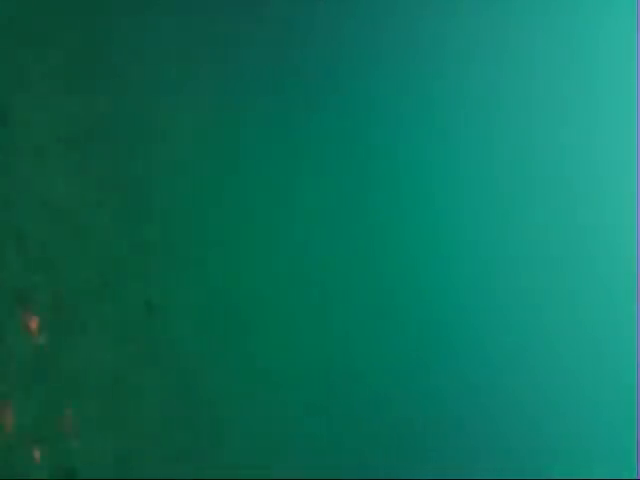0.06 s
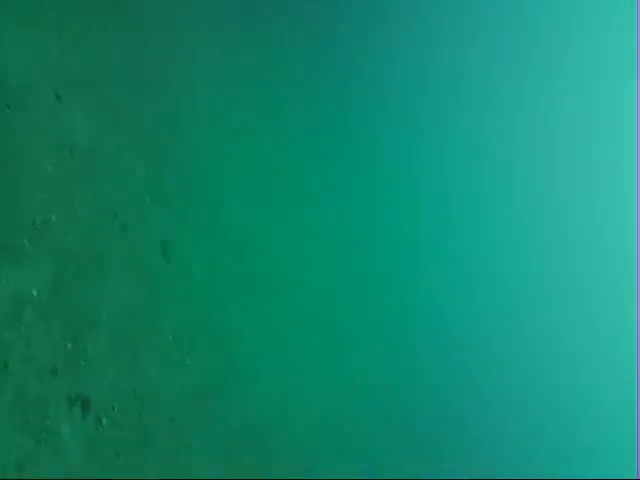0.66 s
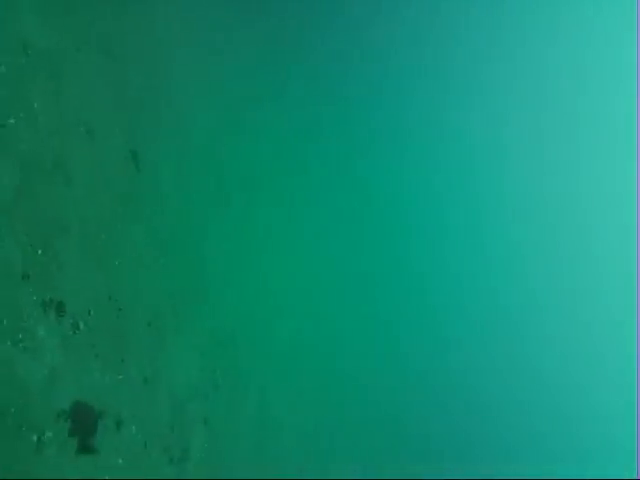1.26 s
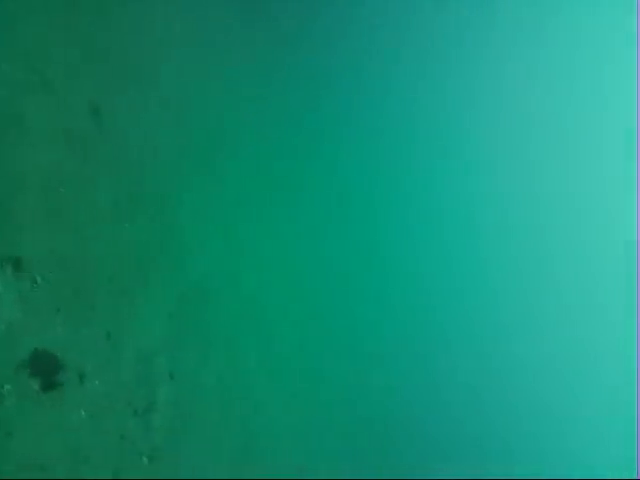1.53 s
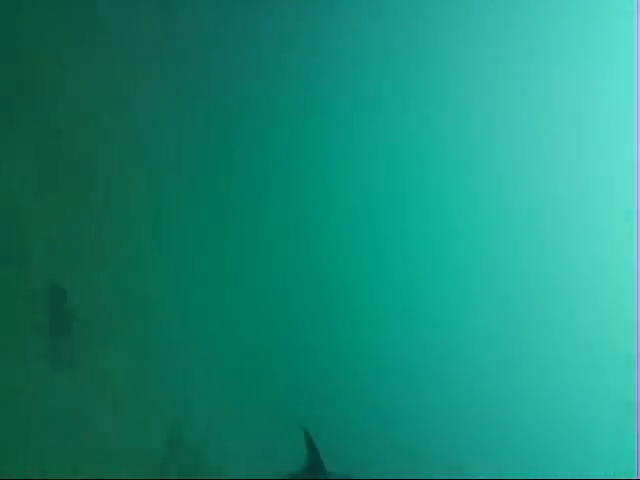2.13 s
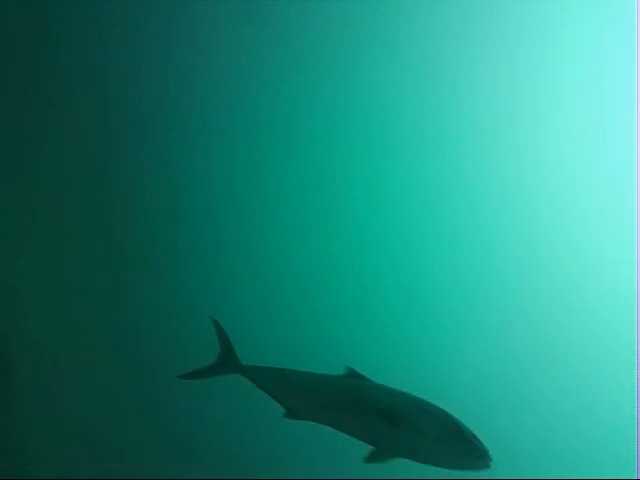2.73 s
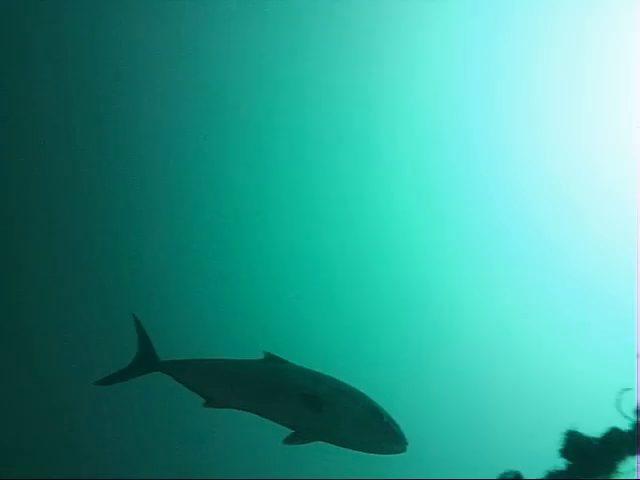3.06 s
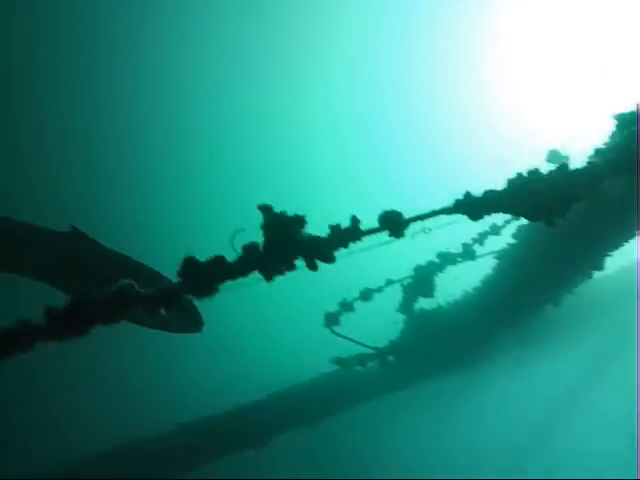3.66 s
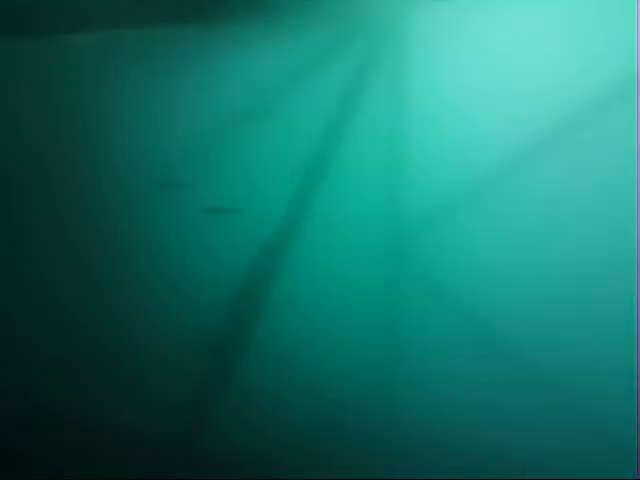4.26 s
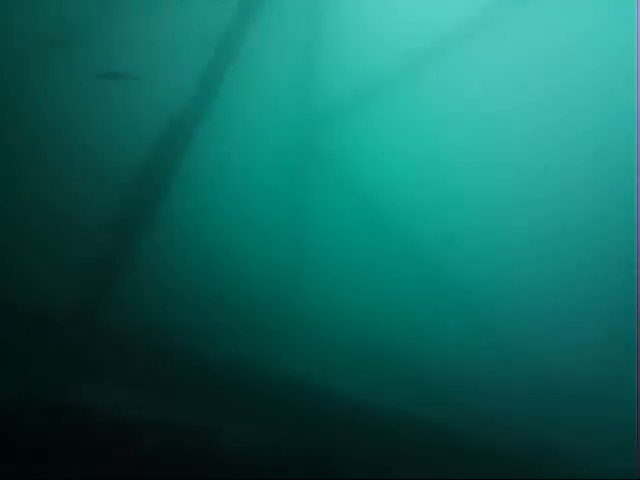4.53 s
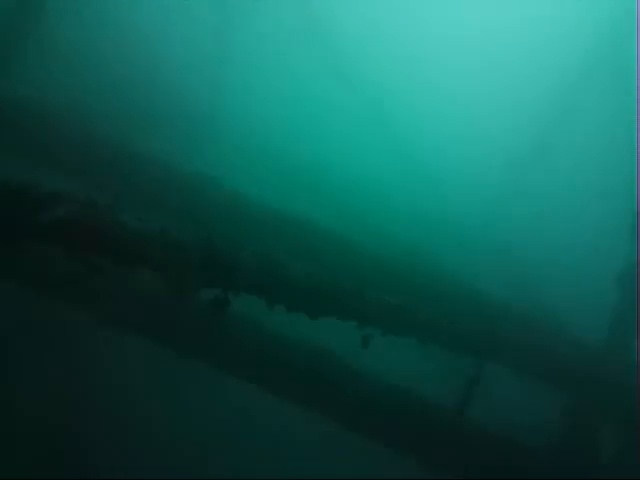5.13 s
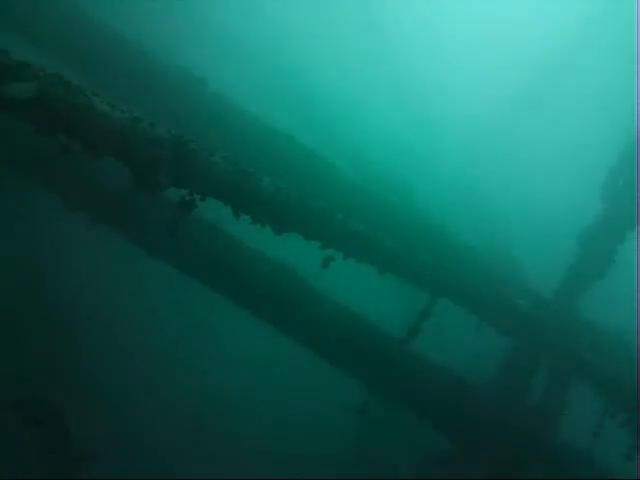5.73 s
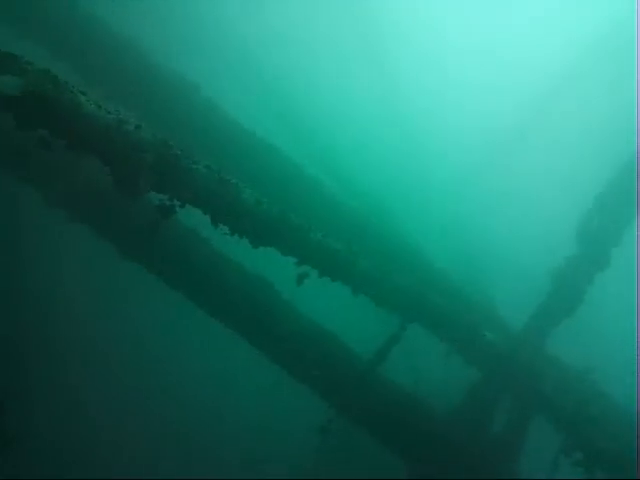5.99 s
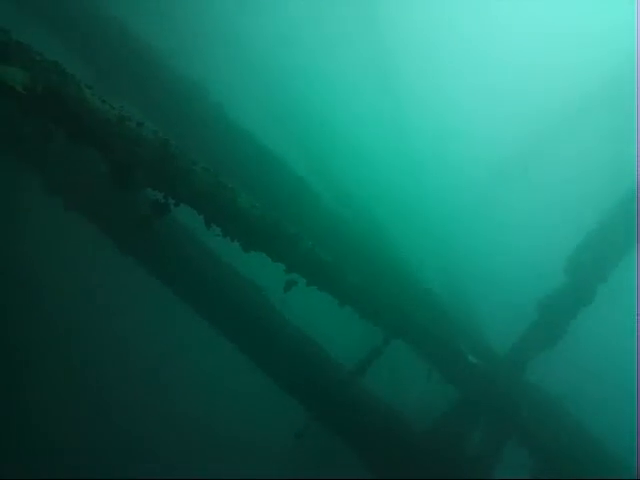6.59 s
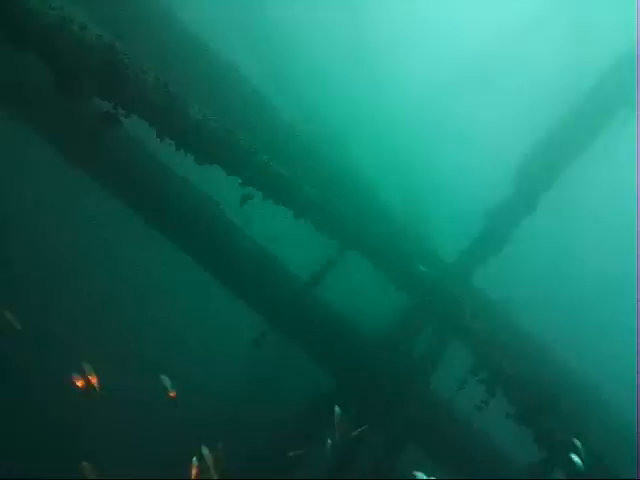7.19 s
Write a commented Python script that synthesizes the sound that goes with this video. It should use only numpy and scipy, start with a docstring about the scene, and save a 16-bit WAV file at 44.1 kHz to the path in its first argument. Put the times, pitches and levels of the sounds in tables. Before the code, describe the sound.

Muffled underwater rumble and faint hiss with scattered knocks, rubs and small bubbles, broken midway by one loud, distorted crack on the camera housing.

```python
"""Under water by a sunken frame, heard from inside the sealed housing of a diver's camera.
Water rumbles as the diver moves, over the steady hiss and whine of the electronics.
Fingers and gear rub, knock and tick on the housing, which rings briefly, and small bubbles pop.
Midway one hard blow cracks against the shell and overloads the input; the shell flexes and lets go."""
import sys
import numpy as np
from scipy import signal
from scipy.fft import rfft, irfft
from scipy.io import wavfile
from scipy.ndimage import uniform_filter1d

SR = 44100
rng = np.random.default_rng(int(sys.argv[2]) if len(sys.argv) > 2 else 0)


def bounce(signal):
    """Save signal as a 16-bit WAV file at the path given by the first command-line argument."""
    frames = np.transpose(np.atleast_2d(signal))
    limited = np.clip(frames, -1, 1)
    pcm = np.round(limited * 32767).astype(np.int16)
    wavfile.write(sys.argv[1], SR, pcm)


N = 320607
TIME = np.arange(N) / SR
SOFT_TAPER = 0.55  # share of a slide that the soft palm spends swelling and fading

# water pushing on the housing, strongest as the camera swings into the blow: [t/s, level/dB]
FLOW_CURVE = [(0, -34.5), (.45, -37), (1.2, -36), (1.75, -42.5), (2.3, -44), (3.1, -41), (3.76, -31.5),
              (3.89, -25), (4.02, -40), (4.55, -46.5), (5, -50), (5.9, -49), (7.27, -54)]
# colours of the slow swirls, the small eddies and the electronic hiss: [f/Hz, level/dB]
RUMBLE_EQ = [(1, 15), (5, 7.5), (10, 10), (16, -6), (24, -4.5), (34, -3), (50, -33.5), (80, -24),
             (200, -93)]
FLUTTER_EQ = [(20, -48), (45, 2), (60, 3), (95, -2), (140, -6), (200, -16), (400, -81)]
HISS_EQ = [(30, 14.5), (90, 5.5), (135, -10), (195, -2), (275, 0.5), (700, 0.5), (2000, 0.8), (4200, -1),
           (5500, -5.5), (7200, -5.5), (9000, -11), (10200, -19.5), (12400, -30), (13000, -80)]
# thin steady tones of the electronics: [f/Hz, level/dB]
WHINE_TONES = [(4048, -70), (6977, -75)]
# the grip creeping on the housing, almost still after the hard blow: [t/s, level/dB]
GRIP_CURVE = [(0, -54.5), (.85, -53), (1.6, -62), (2.6, -53.5), (3.75, -57), (4.1, -82), (4.75, -82),
              (4.95, -67), (5.4, -63), (6, -61.5), (6.3, -61.5), (7.27, -58.5)]
# firmer slides of the hand: [start/s, end/s, dull scuff/dB, gritty scrape/dB, low push/dB, wall f/Hz]
SLIDE_CUES = [(0.069, 0.13, -59, -42.5, -36, 493), (0.35, 0.416, -74, -48, -39, 640),
              (0.467, 0.63, -68, -62, -49, 275), (0.901, 1.054, -47, -51.5, -45, 288),
              (1.311, 1.428, -53, -65, -53, 430), (2.542, 2.71, -65, -72, -62, 275),
              (3.04, 3.156, -52, -63, -45, 430), (3.132, 3.25, -67, -80, -48, 557),
              (3.816, 3.89, -33.5, -37.5, -47, 286), (3.863, 3.943, -44, -39, -47, 297),
              (4.172, 4.22, -51.5, -58, -55, 358), (5.118, 5.275, -56, -56, -50, 376),
              (5.424, 5.56, -66, -72, -54, 283), (6.182, 6.282, -58.5, -74, -71, 384),
              (6.274, 6.457, -69.5, -81, -62, 305), (6.684, 6.816, -62, -75, -57, 350),
              (7.228, 7.328, -57.5, -83, -65, 556)]
# colour of the dull scuffing: [f/Hz, level/dB]
RUB_EQ = [(40, -26), (110, 1), (160, 5.5), (210, 5), (300, 5), (360, -43), (425, -4), (560, 6), (760, -5),
          (1020, -3), (1300, -2), (1650, -12), (2600, -14), (8000, -21), (13000, -18)]
# resonances of the housing: [f/Hz, level/dB, t60/s]
HOUSING_MODES = [(298.5, -10.5, 0.18), (370, -18, 0.12), (416, -2, 0.036), (725.4, -2.5, 0.093),
                 (824, 5, 0.025), (1250, -4.5, 0.037), (1400, -3.5, 0.059), (1996, 16, 0.042),
                 (2067, 8.5, 0.063), (2120, -20, 0.026), (2330, -3, 0.039), (2780, -19, 0.094),
                 (3334, 2.5, 0.014), (3750, 0, 0.064), (4287, -8.5, 0.044), (4830, -10.5, 0.052),
                 (5380, -3.5, 0.021), (5640, -7, 0.023), (6130, -9.5, 0.046), (6820, -11, 0.031),
                 (7250, -5.5, 0.053), (7670, -12, 0.04), (8960, 0, 0.072), (9147, -6, 0.03),
                 (12000, -14, 0.047)]
# knocks on the housing: [t/s, ring/dB, snap over ring/dB, thud over ring/dB, wall f/Hz]
KNOCK_CUES = [(0.073, -33.5, 6, -3, 306), (0.121, -42, 4, -1, 850), (0.167, -40, -5.5, -6.5, 726),
              (0.302, -39.5, -2.5, -21, 277), (0.3373, -41, -3, -23, 440), (0.3527, -34.5, -4.5, -21, 640),
              (0.401, -59.5, 1, 15, 611), (0.5455, -24.5, -0.5, -11.5, 274), (0.5709, -53, 10, 3, 406),
              (0.894, -43, -9, -5, 427), (0.928, -47, -17, 11.5, 480), (0.957, -36, -16, 5, 292),
              (0.973, -35, -6, 0.5, 313), (0.999, -43, -17, 15, 513), (1.0112, -32, -13, -9, 300),
              (1.024, -40, -15, -9, 301), (1.1553, -47.5, -4, -12, 278), (1.3095, -53.5, -6, 14.5, 607),
              (1.3202, -29, 0.5, -12, 412), (1.34, -33.5, -11.5, 2, 427), (1.6512, -46, -5, -1, 505),
              (3.0474, -46, -12, -2, 415), (3.674, -38, -3.5, 3, 776), (3.7357, -43, -4, 5, 293),
              (3.7768, -45.5, -5, 8, 785), (3.8217, -24, -24, 2.5, 695), (3.8314, -28, -3, -15, 420),
              (3.8624, -23.5, 9.5, 2, 322), (3.879, -17, -1.5, -11, 286), (3.949, -29.5, -12, -9, 743),
              (5.133, -49, -11, -5, 400), (5.1454, -39.5, -8, -2, 620), (5.1601, -39, -6, 1, 420),
              (5.242, -48, 1, 1, 380), (5.4606, -48, -4, 1, 288), (5.5223, -47.5, -11, -1, 280),
              (5.5842, -41.5, -11, -9, 376), (5.5964, -48, -2.5, 2.5, 306), (5.7922, -50.5, -9, 4, 320),
              (5.824, -50.5, -7, -3, 788), (6.1069, -28, 1, -2.5, 760), (6.1132, -32.5, -2.5, 0.5, 340),
              (6.5828, -43.5, -15, -5, 360), (6.763, -40.5, -18, -17, 355)]
# colour of the dense, short clack under the modes: [f/Hz, level/dB]
CLACK_EQ = [(60, 1), (190, -14), (300, 19), (900, 5), (1500, 6), (3000, -16), (6000, -4), (8500, -12),
            (10500, -9), (13000, -36)]
# light ticks of loose gear: [t/s, level/dB]
TICK_CUES = [(0.2115, -45), (2.133, -46), (2.253, -35.5), (2.293, -45), (2.385, -37), (2.659, -49),
             (2.817, -45.5)]
# resonances of that gear: [f/Hz, level/dB, t60/s]
GEAR_MODES = [(1290, -4.5, 0.12), (1720, -5, 0.035), (1896, 1, 0.046), (2050, -9, 0.035),
              (9660, -16, 0.067), (12350, -19, 0.12)]
# colour of the diffuse echo behind a tick: [f/Hz, level/dB]
TICK_ECHO_EQ = [(700, -25), (1050, -6), (1150, -18), (1290, 0.5), (1450, -25), (1800, -14), (2350, -20),
                (3000, -36), (12000, -45)]
# a hard edge catching on the shell: [t/s, level/dB]
CATCH_CUES = [(0.352, -40.5), (1.0096, -50), (1.022, -47), (1.342, -56), (5.133, -53)]
# bubbles breaking loose: [t/s, level/dB, starting f/Hz, low gulp/dB]
BUBBLE_CUES = [(0.584, -41, 1230, -43.5), (0.621, -48, 1150, -53), (0.758, -52, 657, -49),
               (0.779, -50, 1090, -66), (0.8186, -46, 1190, -70), (0.889, -46.5, 820, -73),
               (1.308, -41.5, 636, -42), (1.662, -47.5, 537, -50), (2.509, -47.5, 990, -47),
               (2.612, -57, 554, -44), (2.658, -45, 547, -42), (3.078, -48, 760, -58),
               (3.112, -48, 616, -61), (4.926, -71, 560.0, -50), (6.206, -60, 880.0, -40),
               (6.487, -54, 990, -74.5)]
# the hard blow and its rebound: [t/s, contact/s, level/dB, favoured mode f/Hz, mode over crack/dB]
BLOW_CUES = [(3.854, 0.0083, 3, 2086, -9.5), (3.8775, 0.006, -24, 4250, -5)]
# colour of the blow's crack: [f/Hz, level/dB]
CRACK_EQ = [(60, -8), (190, -9), (280, 5), (480, -3), (720, -2), (1000, 2), (1500, -4), (2100, 2),
            (2900, 1), (5500, -2), (8000, -9), (10500, -26), (12000, -20), (16000, -36)]


def amp(db):
    return 10 ** (np.asarray(db) / 20)


def rms(x):
    return np.sqrt(np.mean(x ** 2) + 1e-20)


def add(mix, start_s, sound):
    part = mix[max(round(start_s * SR), 0):][:len(sound)]
    part += sound[:len(part)]


def fader(curve):
    """Gain over the whole scene, riding through [t/s, level/dB] points."""
    return amp(np.interp(TIME, *np.transpose(curve)))


def colour(x, eq):
    """Shapes x with an EQ curve of [f/Hz, level/dB] points; rms 1."""
    hz, db = np.transpose(eq)
    f = np.fft.rfftfreq(len(x), 1 / SR)
    gain = amp(np.interp(np.log(f + 1), np.log(hz + 1), db)) * (f > 0)
    shaped = irfft(rfft(x) * gain, len(x))
    return shaped / rms(shaped)


def band(x, edge_hz, kind="bandpass", order=3):
    return signal.sosfilt(signal.butter(order, edge_hz, kind, fs=SR, output="sos"), x)


def at_peak(x, db):
    """Scales a hit so that its loudest 5 ms sit at db."""
    return x * amp(db) / np.sqrt(uniform_filter1d(x ** 2, 220).max() + 1e-20)


def stroke(start, end, taper=0.24):
    """The force of one slide: it swells, holds and lets go; taper is the share spent in the fades."""
    return signal.windows.tukey(round((end - start) * SR), taper)


def ring(modes, t, spread_db, detune=0):
    """Dying modes; where the hit lands sets their strength and sign, and the grip bends their pitch."""
    hz, db, t60 = np.transpose(modes)[:, :, None]
    strength = amp(db + spread_db * rng.standard_normal(hz.shape)) * rng.choice([-1, 1], hz.shape)
    hz = hz + detune * np.sqrt(hz) * rng.standard_normal(hz.shape)
    return (strength * amp(-60 * t / t60) * np.sin(2 * np.pi * hz * t)).sum(0)


def wall_note(hz, t60):
    """One dying note of a wall of the housing."""
    t = np.arange(8192) / SR
    return amp(-60 * t / t60) * np.sin(2 * np.pi * hz * t)


def jolts(jolt_db=-14, swell_s=0.013):
    """How hard the housing is shaken: a push during each slide, a quick swell after each thud."""
    out, age = np.zeros(N), np.arange(8192) / SR / swell_s
    for start, end, _, _, push_db, _ in SLIDE_CUES:
        add(out, start, amp(push_db) * stroke(start, end))
    for start, ring_db, _, thud_db, _ in KNOCK_CUES:
        add(out, start, amp(ring_db + thud_db + jolt_db) * age * np.exp(1 - age))
    return out


def water(rumble_db=-1, flow_eddies_db=-26, grip_eddies_db=1):
    """The low bed: slow swirls press on the housing; eddies flutter, stirred by flow, grip and jolts."""
    flow, grip = fader(FLOW_CURVE), fader(GRIP_CURVE)
    swirls = colour(rng.standard_normal(N), RUMBLE_EQ)
    swirls /= rms(band(swirls, [20, 55]))  # the audible sub-bass sets the level
    eddies = colour(rng.standard_normal(N), FLUTTER_EQ)
    stir = np.sqrt((flow * amp(flow_eddies_db)) ** 2 + (grip * amp(grip_eddies_db)) ** 2 + jolts() ** 2)
    return swirls * flow * amp(rumble_db) + eddies * stir


def electronics(hiss_db=-54.5):
    """The camera's own steady hiss and thin whine."""
    whine = sum(amp(db) * np.sqrt(2) * np.sin(2 * np.pi * hz * TIME) for hz, db in WHINE_TONES)
    return amp(hiss_db) * colour(rng.standard_normal(N), HISS_EQ) + whine


def slips(per_s, size_db):
    """Stick and slip: a random train of tiny jerks, mostly small, a few large."""
    size = amp(size_db * np.minimum(rng.exponential(1, N), 3))
    return size * rng.choice([-1, 1], N) * (rng.random(N) < per_s / SR)


def hand_motion(grip_db=-2, ease_db=-6, ease_s=0.051):
    """How hard the hand moves on the shell: the creeping grip plus the slides."""
    slides = np.zeros(N)
    for start, end, scuff_db, *_ in SLIDE_CUES:
        add(slides, start, amp(scuff_db) * stroke(start, end, SOFT_TAPER))
    # the hand starts to slip before each slide and settles after it
    pole = np.exp(-1 / (ease_s * SR))
    eased = signal.filtfilt([1 - pole], [1, -pole], slides, padtype=None)
    return amp(grip_db) * fader(GRIP_CURVE) + slides + amp(ease_db) * eased


def rubbing(dull_db=-3, hollow_db=-5, grip_grit_db=-15):
    """The hand slips on the shell: a dull scuff, hollow low modes and a fine grit from the high ones."""
    dull = colour(slips(per_s=1500, size_db=2.6), RUB_EQ)
    jerks = slips(per_s=2500, size_db=2.5)
    shell = signal.oaconvolve(jerks, ring(HOUSING_MODES, TIME[:4096], spread_db=0))[:N]
    hollow = band(shell, 480, "lowpass", order=4)
    grit = band(shell, 2600, "highpass", order=2)
    grit_gain = amp(grip_grit_db) * fader(GRIP_CURVE)
    for start, end, _, scrape_db, _, _ in SLIDE_CUES:
        add(grit_gain, start, amp(scrape_db) * stroke(start, end))
    scuff = amp(dull_db) * dull + amp(hollow_db) * hollow / rms(hollow)
    return hand_motion() * scuff + grit_gain * grit / rms(grit)


def groans(trim_db=-2, t60=0.06):
    """Each slide shakes the wall under the hand, which hums at its own hollow pitch."""
    out = np.zeros(N)
    for start, end, scuff_db, _, _, wall_hz in SLIDE_CUES:
        force = stroke(start, end, SOFT_TAPER)
        hum = signal.fftconvolve(force * rng.standard_normal(len(force)), wall_note(wall_hz, t60))
        add(out, start, amp(scuff_db + trim_db) * hum / rms(hum[:len(force)]))
    return out


def knock(ring_db, snap_db, thud_db, wall_hz, clack_t60=0.068, chatter=0.49, contact_s=0.0008):
    """A chattering contact rings the housing; hard ones snap, soft ones thud with the wall's note."""
    t = np.arange(8192) / SR
    body = ring(HOUSING_MODES, t, spread_db=2.5, detune=0.36)
    clack = colour(rng.standard_normal(len(t)), CLACK_EQ)
    body += amp(0.5 * snap_db - 1 - 60 * t / clack_t60) * clack  # harder contact, more clack
    body *= 1 - np.exp(-t / 0.00017)  # the ring builds as the shell is pressed
    body *= amp(-1500 * amp(ring_db) * t)  # a heavy contact stays on the shell and damps it
    force = rng.standard_normal(len(t)) * np.exp(-t / contact_s)
    force *= chatter / np.linalg.norm(force)
    force[0] += 1  # the clean impact ahead of the chatter
    hit = signal.fftconvolve(force, body)[:len(t)]
    # even the softest touch rings the main pair of modes and their high overtone
    main = band(hit, [1250, 2750], order=4) + amp(-12) * band(hit, [8700, 9300], order=2)
    snap = band(hit, [2900, 8700], order=4)
    lows = band(hit, 1000, "lowpass", order=4)
    thud = at_peak(lows, 0) + at_peak(wall_note(wall_hz, t60=0.04), 1)
    return at_peak(main, ring_db) + at_peak(snap, ring_db + snap_db) + at_peak(thud, ring_db + thud_db)


def knocks(trim_db=-2.5, bounce_s=0.008, bounce_db=-7):
    """Fingers and gear knock on the housing and bounce once, a little later and weaker."""
    out = np.zeros(N)
    for start, ring_db, *timbre in KNOCK_CUES:
        add(out, start, knock(ring_db + trim_db, *timbre))
        rebound = start + bounce_s * rng.uniform(0.5, 1.4)
        add(out, rebound, knock(ring_db + trim_db + bounce_db, *timbre))
    return out


def skid(start_s=0.081, end_s=0.116, level_db=-39):
    """A hard edge chatters across the shell and excites only its upper modes: a dry scrape."""
    out, force = np.zeros(N), stroke(start_s, end_s)
    chatter = force * rng.standard_normal(len(force))
    shell = signal.fftconvolve(chatter, ring(HOUSING_MODES, TIME[:4096], spread_db=-3))
    scrape = band(shell, [4000, 8000])
    add(out, start_s, amp(level_db) * scrape / rms(scrape[:len(force)]))
    return out


def ticks(trim_db=-1, snap_db=-2, fizz_db=-14, echo_db=-9, dry_t60=0.02, echo_t60=0.41):
    """Loose gear taps lightly: a dry, bright-edged snap, a few short modes and an echo in the water."""
    out, t = np.zeros(N), np.arange(16384) / SR
    attack = 1 - np.exp(-t / 0.00023)
    for start, db in TICK_CUES:
        burst = rng.standard_normal(len(t)) * amp(-60 * t / dry_t60)
        snap = at_peak(band(burst, [1200, 2400]), snap_db)
        fizz = at_peak(band(burst, [8750, 9600]), fizz_db)
        echo = colour(rng.standard_normal(len(t)), TICK_ECHO_EQ) * amp(echo_db - 60 * t / echo_t60)
        gear = at_peak(ring(GEAR_MODES, t, spread_db=4.5, detune=0.63), 0)
        add(out, start, at_peak((gear + snap + fizz + echo) * attack, db + trim_db))
    return out


def catches(t60=0.016):
    """A hard edge catches on the shell: a tiny dry tick of quickly dying treble."""
    out, t = np.zeros(N), np.arange(2048) / SR
    for start, db in CATCH_CUES:
        burst = rng.standard_normal(len(t)) * amp(-60 * t / t60)
        add(out, start, at_peak(band(burst, [5100, 5900]), db))
    return out


def bubbles(gulp_trim_db=-1, rise_per_s=4.4, puff_gain=0.39, t60=0.027):
    """Each bubble rings briefly, rising a little, with a puff and a low gulp as it breaks loose."""
    out, t = np.zeros(N), np.arange(4096) / SR
    envelope = amp(-60 * t / t60) * (1 - np.exp(-t / 0.00062))
    for start, db, hz, gulp_db in BUBBLE_CUES:
        tone = np.sin(2 * np.pi * hz * t * (1 + rise_per_s * t))
        puff = band(rng.standard_normal(len(t)), [600, 1600])
        gulp = band(rng.standard_normal(len(t)), [220, 480])
        add(out, start, at_peak((tone + puff_gain * puff / rms(puff)) * envelope, db))
        add(out, start, at_peak(gulp * envelope, gulp_db + gulp_trim_db))
    return out


def hard_blows(drop_db=-10, tail_t60=0.014, ring_db=-10, note_t60=0.069, travel=0.69):
    """Something hard crunches on the shell and strikes again; one mode rings on above the rest."""
    out, t = np.zeros(N), np.arange(8192) / SR
    for start, contact_s, db, note_hz, note_db in BLOW_CUES:
        after = np.maximum(t - contact_s, 0)
        envelope = amp(drop_db * np.minimum(after / 0.00025, 1) - 60 * after / tail_t60)
        crack = colour(rng.standard_normal(len(t)), CRACK_EQ) * envelope
        shell = at_peak(ring(HOUSING_MODES, t, spread_db=-6), ring_db)
        note = at_peak(wall_note(note_hz, note_t60), note_db)
        add(out, start, amp(db) * (crack + shell + note))
    flattened = travel * np.tanh(out / travel)  # the microphone runs out of travel
    return band(flattened, 8000, "lowpass")


def flex(start_s=3.892, release_s=3.9345, rise_s=0.0069, push_db=-7.5):
    """After the hard blow the shell is pressed in, then lets go at once with a pop."""
    out, t = np.zeros(N), np.arange(round((release_s - start_s) * SR)) / SR
    add(out, start_s, amp(push_db) * (1 - np.exp(-(t / rise_s) ** 2)))
    return band(out, 7000, "lowpass", order=1)


def scene():
    """The mono mix: handling, the hard blow, the water outside and the camera's own noise."""
    handling = knocks() + catches() + ticks() + rubbing() + groans() + skid() + flex()
    # a steep low-pass at 12.5 kHz removes the highest treble from the handling sounds
    handling = band(handling, 12500, "lowpass", order=24)
    return (handling + hard_blows() + bubbles() + water() + electronics())[None]


def record(dry, dc_offset=-0.027, ceiling=0.76, edge_hz=16200):
    """The input sits slightly off centre and soft-clips on the hard blow; a steep high cut follows."""
    shifted = dry + dc_offset
    clipped = shifted / (1 + (shifted / ceiling) ** 8) ** (1 / 8)
    high_cut = signal.firwin(511, edge_hz, window=("kaiser", 9), fs=SR)
    return signal.oaconvolve(clipped, high_cut[None], "same")


dry = scene()
out = record(dry)
bounce(out)
```